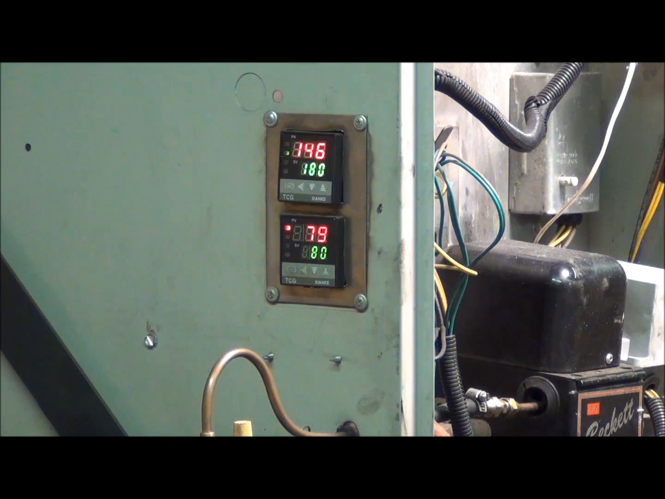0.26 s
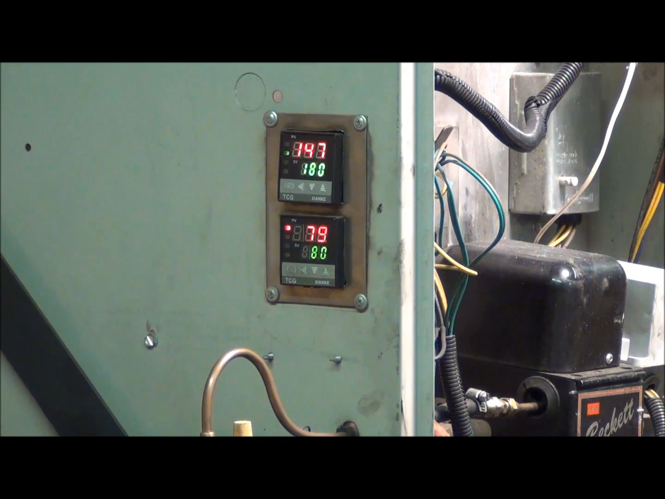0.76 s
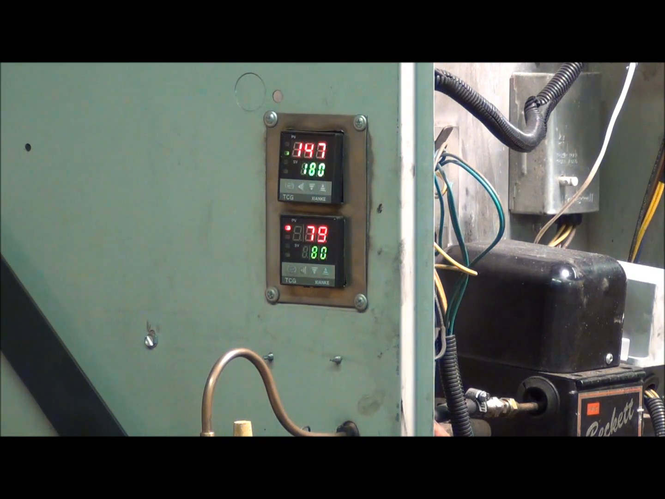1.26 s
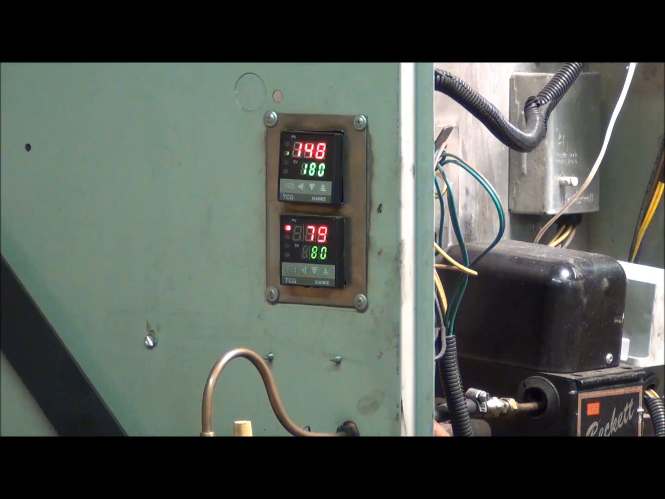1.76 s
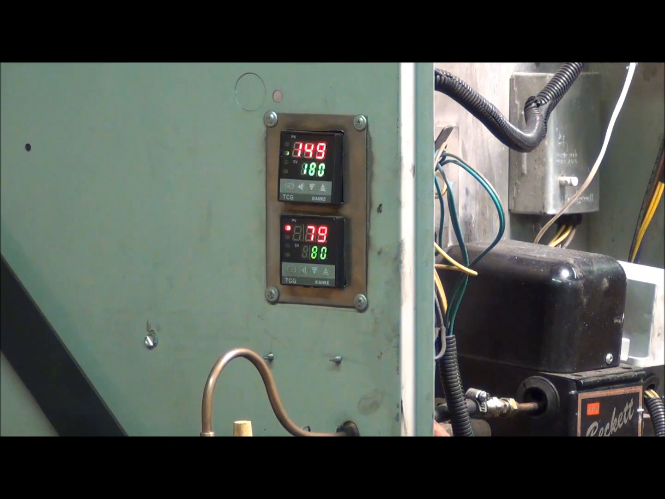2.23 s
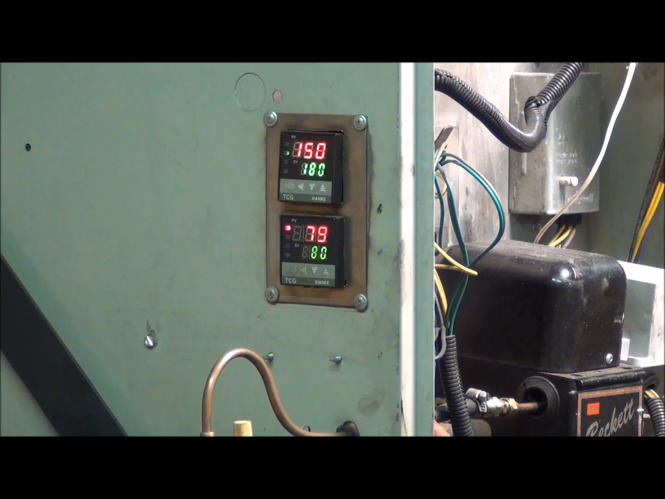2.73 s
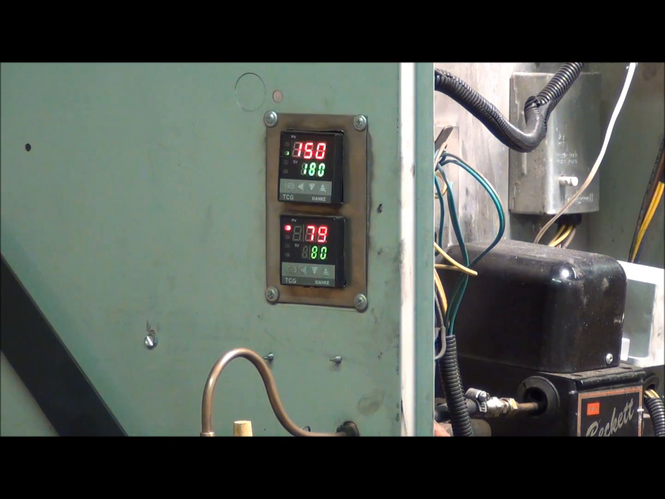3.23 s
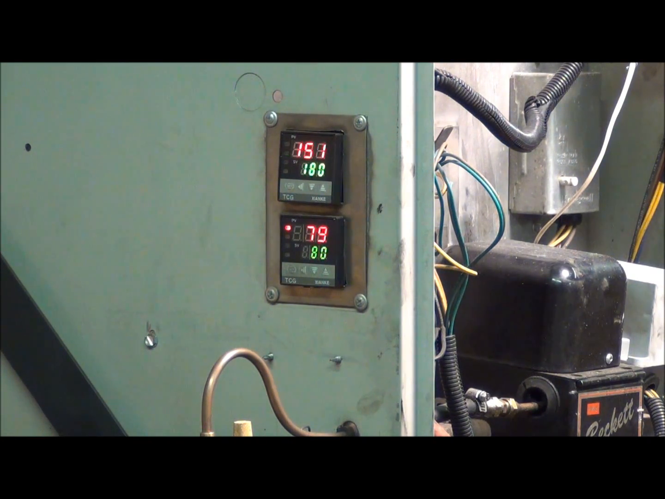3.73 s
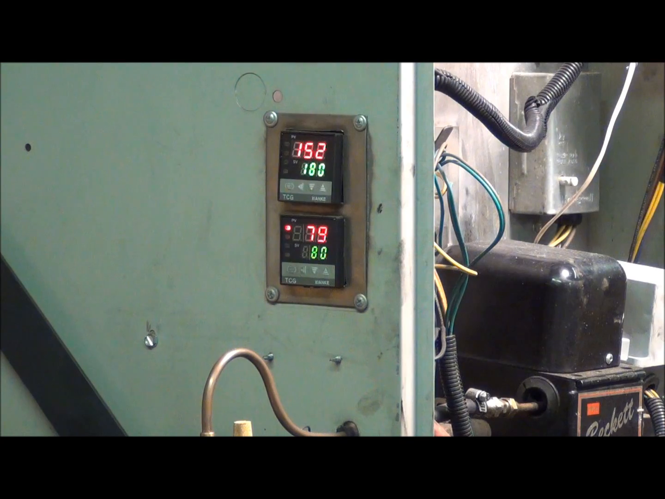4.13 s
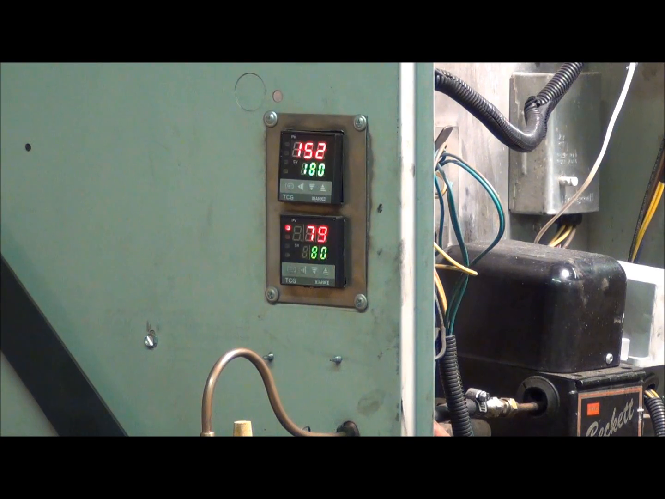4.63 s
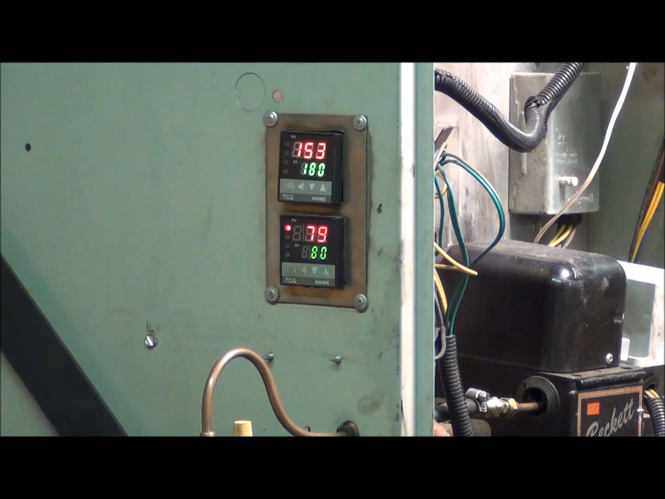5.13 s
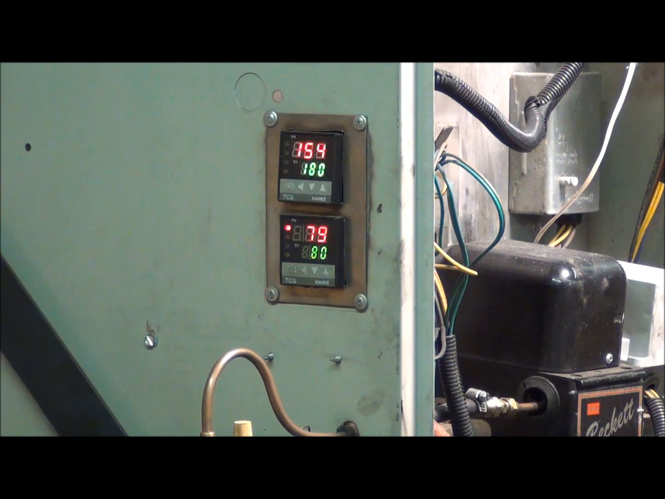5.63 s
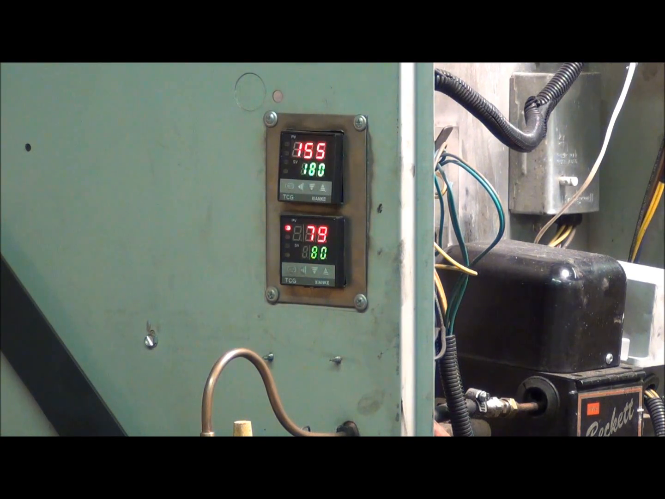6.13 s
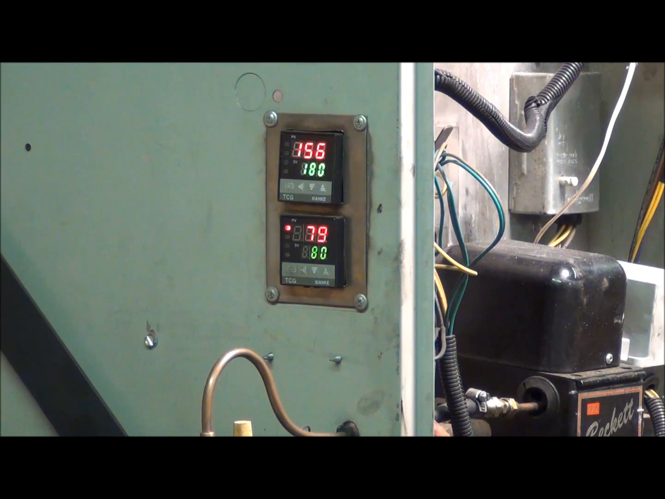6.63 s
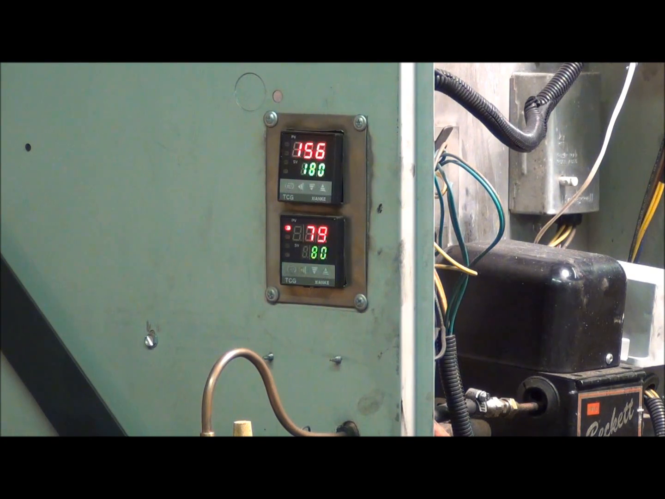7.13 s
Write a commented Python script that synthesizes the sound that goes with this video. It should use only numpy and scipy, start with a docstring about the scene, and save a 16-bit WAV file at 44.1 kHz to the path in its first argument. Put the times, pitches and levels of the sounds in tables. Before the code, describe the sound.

An oil burner's electrics hum and buzz close to the microphone in a workshop, with a thin sizzling edge. Behind them run a small, slightly wavering motor and a soft rush of air. Midway a metal latch snaps once, briefly ringing its thin steel box. About two seconds later something knocks dully further off in the room, while the buzz carries on unchanged.

```python
"""Oil boiler in a workshop

The burner's electrics hum and buzz up front: each mains cycle the core tugs at its housing
and loose laminations slap together. Behind them sit a small wavering motor and a soft rush of air.
Midway a metal latch snaps once and rings its thin steel box; two seconds later
something knocks dully further off in the room."""
import sys
import numpy as np
from scipy import signal
from scipy.fft import rfft, irfft, next_fast_len
from scipy.io import wavfile

SR = 44100
rng = np.random.default_rng(int(sys.argv[2]) if len(sys.argv) > 2 else 0)


def dump(signal):
    """Clip the signal to [-1, 1] and save it as 16-bit WAV at the path in sys.argv[1]."""
    limited = np.clip(np.atleast_2d(signal).T, -1, 1)
    pcm = np.round(limited * 32767).astype(np.int16)
    wavfile.write(sys.argv[1], SR, pcm)


N = 325458
TIME = np.arange(N) / SR
MAINS_HZ, CORE_RING_HZ = 60, 6030
SIDES = np.array([[1], [-1]])  # left, right

# Stereo width of sound from all round the room: f/Hz, side minus mid/dB
ROOM_WIDTH = [(40, -18), (130, -25), (300, -9.5), (700, -8.5), (1500, -5.5), (8000, -2), (12000, -12),
              (15000, -22)]
# Tone that the walls give back: f/Hz, gain/dB
WALL_EQ = [(200, -5.5), (650, 9), (1600, 3), (4500, 2.5), (9000, -1), (14000, -1)]
# Bed of rushing air: f/Hz, level/dB per Hz
AIR_SPECTRUM = [(12, -101), (38, -81.5), (100, -79), (160, -76), (235, -75), (400, -76.5), (750, -79.5),
                (1050, -77.5), (1550, -82), (2700, -86), (3600, -86.5), (7000, -91), (9500, -88),
                (15500, -90.5)]
# Tones of the motor and the panels it shakes: f/Hz, level/dB, wander width/Hz
MOTOR_TONES = [(37, -76, 2), (145, -71, 2), (185, -67, 1.5), (254.8, -56.3, .6), (292.4, -61.5, .4),
               (323.3, -63, .4), (369, -67, .8), (554, -66.5, 1), (2802, -71, 3), (4093, -71, 4)]
# The far knock and its small after-knocks: t/s, relative level/dB
KNOCK_HITS = [(5.761, -3), (5.768, -1), (5.776, -1), (5.815, -11), (5.938, -7)]
# Dull body of the knock: f/Hz, gain/dB
KNOCK_EQ = [(60, -10), (170, 10), (550, 9), (900, -3), (1200, -4), (1700, -4), (2200, 1), (3000, -4),
            (3700, -5), (4600, -17), (8000, -32)]
# Metal contacts of the latch: t/s, relative level/dB
LATCH_HITS = [(3.6555, -8), (3.659, 0), (3.662, 1.5), (3.6665, -1), (3.675, -1.5)]
# Broad tone of the latch and its thin steel box: f/Hz, gain/dB
LATCH_EQ = [(80, -30), (300, -6.5), (640, -12), (1050, -12.5), (1650, -4), (2400, -8.5), (4200, 0.5),
            (5400, -7), (7300, -7), (8400, 2.5), (9600, -6.5), (10500, -1.5), (12400, -15), (14100, 3.5),
            (15400, -21)]
# Clearest modes of that box: f/Hz, relative level/dB, t60/s
BOX_MODES = [(350, -55, .2), (604, -47, .24), (643, -46, .24), (820, -45, .2), (1608, -41, .16),
             (1929, -43, .1), (4252, -43, .05), (8178, -36, .03), (8801, -34, .04)]
# The core pushing and pulling its housing: position/cycle, signed relative force
CORE_TUGS = [(.001, -.95), (.395, .9), (.542, 1)]
# Loose laminations slapping together: position/cycle, signed relative force
LAMINATION_SLAPS = [(.015, 1), (.44, -0.54), (.76, 0.89)]
# Even harmonics, from magnetic pull peaking twice a cycle: f/Hz, base level/dB
EVEN_HARMONICS = [(120, -49.5), (240, -55.5), (480, -50), (600, -52.5), (730, -49.5), (960, -59.5),
                  (1600, -60), (2700, -57.5), (3300, -68), (5000, -64.5), (8300, -70.5), (9500, -84.5),
                  (15500, -89)]
# Weaker odd harmonics, from slightly unequal half cycles: f/Hz, base level/dB
ODD_HARMONICS = [(60, -64), (530, -61.5), (700, -69.5), (1500, -74.5), (3000, -67.5), (4700, -72.5),
                 (6000, -65), (8500, -74.5), (10000, -78.5), (15500, -89)]
# Housing panel modes that lift nearby harmonics: f/Hz, lift/dB, left minus right/dB
HOUSING_MODES = [(180, 15.5, 0), (420, 11.5, 1), (1080, 6, 5.5), (1320, 10.5, -12), (1959, 18.5, -12),
                 (2160, 2, 8), (2400, 3.5, -8), (3743, 13.5, -7.5), (4215, 6, -8), (4560, 10, -4),
                 (4800, 11.5, 3), (5610, 17.5, 4), (6970, 4, 11), (8410, 15, -3)]


def from_db(db):
    """Decibels to linear gain."""
    return 10 ** (np.asarray(db) / 20)


def at_hz(points, hz):
    """Read a curve along a log-frequency axis."""
    known_hz, values = np.transpose(points)
    return np.interp(np.log(np.maximum(hz, 1)), np.log(known_hz), values)


def eq(x, points):
    """Minimum-phase EQ with the given dB curve, so attacks have no pre-ring."""
    size = 2 * next_fast_len(N // 2 + SR // 4)
    gain = from_db(at_hz(points, np.fft.rfftfreq(size, 1 / SR)))
    cepstrum = irfft(np.log(gain))
    cepstrum[1:size // 2] *= 2
    cepstrum[size // 2 + 1:] = 0
    return irfft(rfft(x, size) * np.exp(rfft(cepstrum)))[..., :N]


def drift(rate_hz):
    """Slow random modulator with an RMS of 1."""
    hop, settle = 100, 2000
    pole = np.exp(-2 * np.pi * rate_hz / (SR / hop))
    noise = rng.standard_normal(N // hop + settle + 2)
    slow = signal.lfilter([1], [1, -2 * pole, pole * pole], noise)[settle:]
    return np.interp(np.arange(N) / hop, np.arange(len(slow)), slow / np.sqrt(np.mean(slow ** 2)))


def diffuse_noise():
    """Near-white noise from all round, almost mono in the bass."""
    mid, side = rng.standard_normal((2, N))
    return mid + SIDES * eq(side, ROOM_WIDTH)


def decay(t60):
    """Envelope that falls by 60 dB in t60 seconds."""
    return np.exp(-np.log(1000) * TIME / t60)


def convolve(x, response):
    """Play x through the first second of an impulse response."""
    return signal.fftconvolve(np.atleast_2d(x), response[:, :SR], axes=1)[:, :N]


def noise_tail(x, envelope):
    """Smear x with a unit-energy envelope of diffuse noise: a crowd of modes or reflections."""
    return convolve(x, diffuse_noise() * envelope / np.linalg.norm(envelope))


def room(x, t60, wet_db):
    """Add the workshop's reverb, which builds over the first reflections and loses its treble."""
    envelope = decay(t60) * (1 - decay(0.021))
    return x + from_db(wet_db) * eq(noise_tail(x, envelope), WALL_EQ)


def clicks(hits):
    """One impulse for each contact."""
    track = np.zeros(N)
    for seconds, db in hits:
        track[round(seconds * SR)] += from_db(db)
    return track


def air(flutter_db=0.35):
    """A soft, steady bed of rushing air with hiss on top."""
    flutter = from_db(flutter_db * drift(6))
    return np.sqrt(SR / 2) * flutter * eq(diffuse_noise(), AIR_SPECTRUM)


def motor(waver_db=2.5):
    """The motor and the panels it shakes sing tones that wander in pitch and level."""
    tones = np.zeros(N)
    for hz, db, width_hz in MOTOR_TONES:
        cycles = np.cumsum(hz + width_hz * drift(3.1) / 2) / SR + rng.random()
        amplitude = np.sqrt(2) * from_db(db + waver_db * drift(2.7))
        tones += amplitude * np.sin(2 * np.pi * cycles)
    return tones


def far_knock(gain_db=-2.0):
    """Each hit stirs short-lived panel modes; a dull tone and a wet mix set it far back."""
    knock = eq(noise_tail(clicks(KNOCK_HITS), decay(t60=0.053)), KNOCK_EQ)
    return room(from_db(gain_db) * knock, t60=0.65, wet_db=-1)


def latch(gain_db=2.5):
    """A quick run of metal contacts rattles a small steel box; the hardest sets it ringing."""
    rattle = eq(noise_tail(clicks(LATCH_HITS), decay(t60=0.028)), LATCH_EQ)
    ring = sum(from_db(db) * decay(t60) * np.sin(2 * np.pi * hz * TIME) for hz, db, t60 in BOX_MODES)
    hardest = max(LATCH_HITS, key=lambda hit: hit[1])
    box = convolve(clicks([hardest]), ring[None])
    return room(from_db(gain_db) * (rattle + box), t60=0.55, wet_db=-5.5)


def lamination_sizzle(density_db=-85.0, width_hz=400, decay_cycles=0.08):
    """Each slap throws a little burst of noise into the core's sharp resonance."""
    gate = sum(abs(force) * np.exp(-((TIME * MAINS_HZ - position) % 1) / decay_cycles)
               for position, force in LAMINATION_SLAPS)
    bursts = diffuse_noise() * gate / np.sqrt(np.mean(gate ** 2))
    b, a = signal.iirpeak(CORE_RING_HZ, CORE_RING_HZ / width_hz, fs=SR)
    return from_db(density_db) * np.sqrt(SR / 2) * signal.lfilter(b, a, bursts)


def hum_amplitudes(order, core_lift_db=13, core_half_width_hz=314, ripple_db=6.0, scatter_db=2.0):
    """Stereo voicing of the hum: even and odd harmonics, lifted by core and panel resonances."""
    hz = order * MAINS_HZ
    base_db = np.where(order % 2, at_hz(ODD_HARMONICS, hz), at_hz(EVEN_HARMONICS, hz))
    detune = (hz - CORE_RING_HZ) / core_half_width_hz
    lift_db = core_lift_db / (1 + detune ** 4)
    pan_db = 0
    for mode_hz, mode_db, mode_pan_db in HOUSING_MODES:
        half_width_hz = 20.6 + 0.004 * mode_hz
        nearness = np.exp(-((hz - mode_hz) / half_width_hz) ** 2)
        lift_db = np.maximum(lift_db, mode_db * nearness)
        pan_db += mode_pan_db * nearness
    # standing waves make the upper harmonics uneven, less so where a resonance is heard directly
    uneven = hz / (hz + 2500) * from_db(-lift_db / 2)
    level_db = base_db + lift_db + ripple_db * uneven * rng.uniform(-1, 1, len(hz))
    pan_db += scatter_db * uneven * rng.uniform(-1, 1, len(hz))
    pan = from_db(SIDES * pan_db / 2)
    pan /= np.sqrt(np.mean(pan ** 2, axis=0))
    return np.sqrt(2) * from_db(level_db) * (order > 0) * pan


def mains_hum(gain_db=0.23, echo_per_khz=1.29, spread=0.79, sway=0.07, slap_from_hz=5300):
    """Every mains cycle repeats the same tugs and slaps; room echoes smear their upper harmonics."""
    period = SR // MAINS_HZ
    order = np.arange(period // 2 + 1)
    hz = order * MAINS_HZ

    def pulses(rows):
        return sum(force * np.exp(-2j * np.pi * order * position) for position, force in rows)

    def echoes():
        return (rng.standard_normal(len(hz)) + 1j * rng.standard_normal(len(hz))) / np.sqrt(2)

    def loop(harmonics):
        return irfft(harmonics * period / 2, period)[:, np.arange(N) % period]

    housing = pulses(CORE_TUGS) + echo_per_khz * hz / 1000 * echoes()
    # the slaps stay crisp only near the core's resonance
    core = pulses(LAMINATION_SLAPS) + (0.8 + np.abs(hz - CORE_RING_HZ) / 600) * echoes()
    stereo_phase = spread * from_db(at_hz(ROOM_WIDTH, hz)) * rng.uniform(-1, 1, len(hz))
    phase = np.angle(np.where(hz < slap_from_hz, housing, core)) + SIDES * stereo_phase
    harmonics = from_db(gain_db) * hum_amplitudes(order) * np.exp(1j * phase)
    # the upper harmonics sway slowly in level, more so the higher they lie
    sway_depth = sway * np.sqrt(hz / slap_from_hz)
    shimmer = sum(drift(rate_hz) * loop(harmonics * sway_depth * echoes()) for rate_hz in (0.4, 2.5, 12))
    return loop(harmonics) + shimmer


def scene():
    """Mix the boiler's steady layers with the two one-shots."""
    return mains_hum() + lamination_sizzle() + motor() + air() + latch() + far_knock()


def record(dry, whistle_hz=15734, whistle_db=-65.0, cutoff_hz=15780):
    """Add a faint, high line-scan whistle, then cut the top steeply."""
    whistle = from_db(whistle_db) * np.sin(2 * np.pi * whistle_hz * TIME)
    lowpass = signal.ellip(12, 0.1, 80, cutoff_hz, fs=SR, output="sos")
    return signal.sosfilt(lowpass, dry + whistle)


dry = scene()
out = record(dry)
dump(out)
```